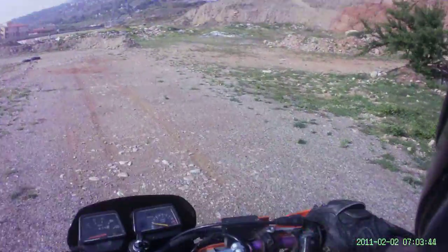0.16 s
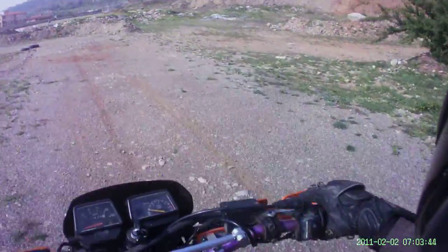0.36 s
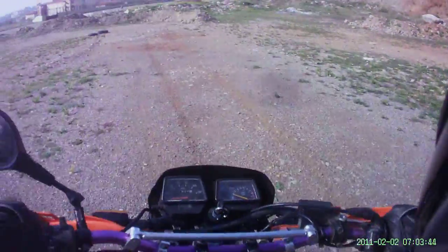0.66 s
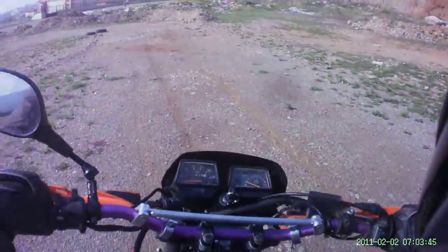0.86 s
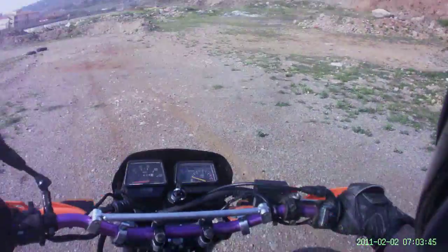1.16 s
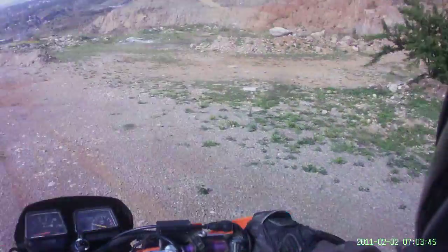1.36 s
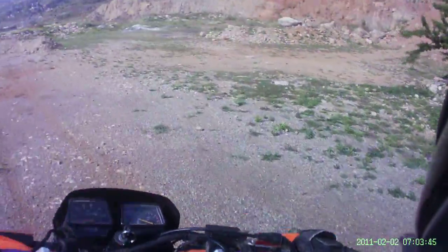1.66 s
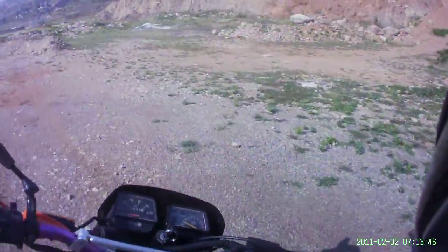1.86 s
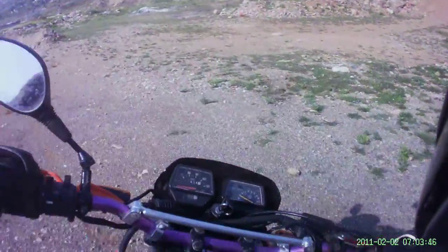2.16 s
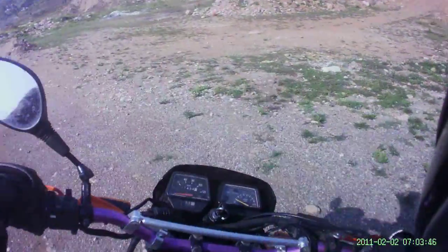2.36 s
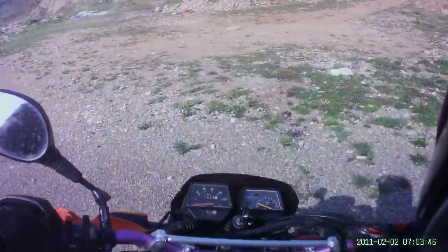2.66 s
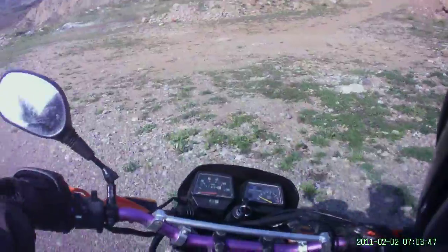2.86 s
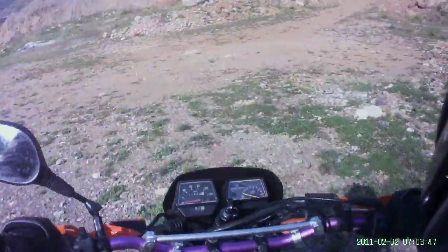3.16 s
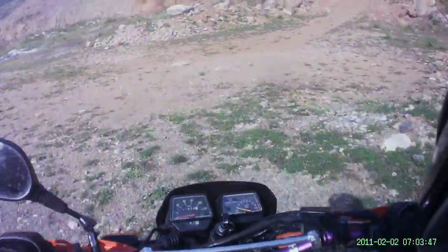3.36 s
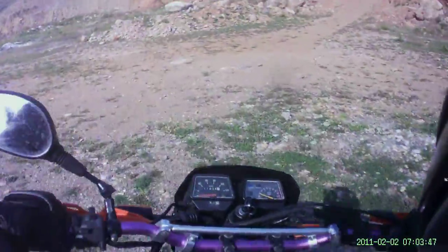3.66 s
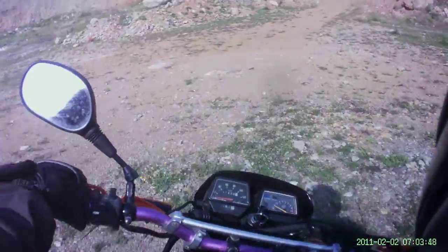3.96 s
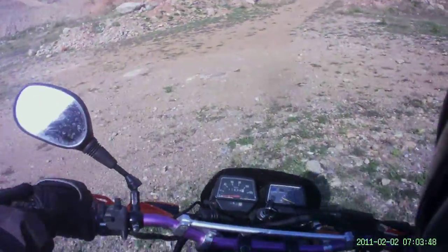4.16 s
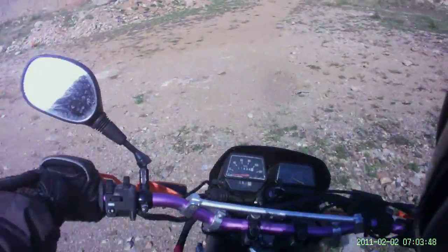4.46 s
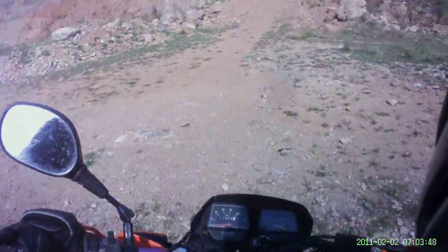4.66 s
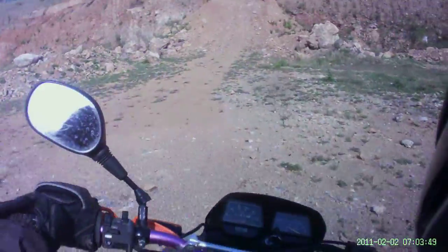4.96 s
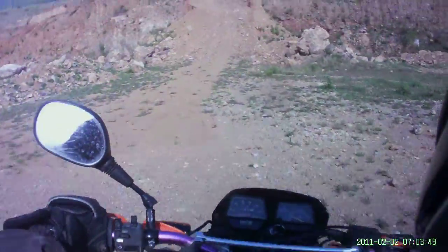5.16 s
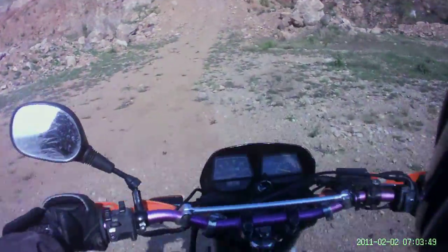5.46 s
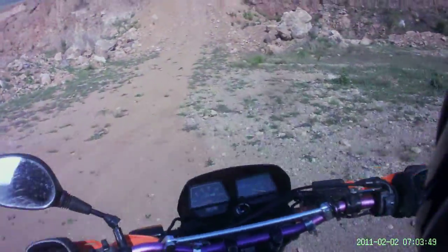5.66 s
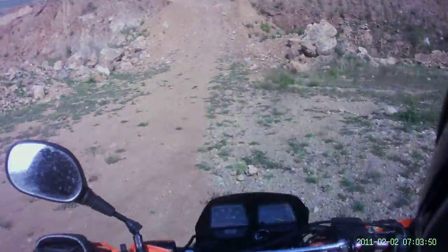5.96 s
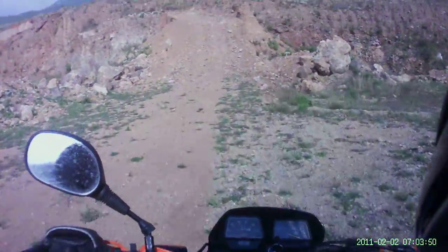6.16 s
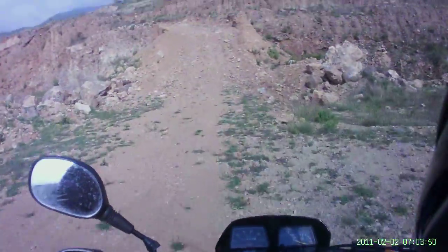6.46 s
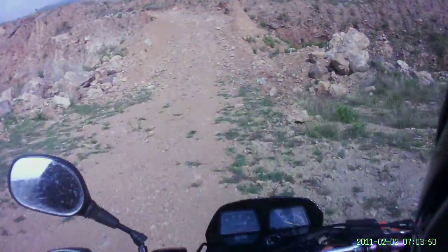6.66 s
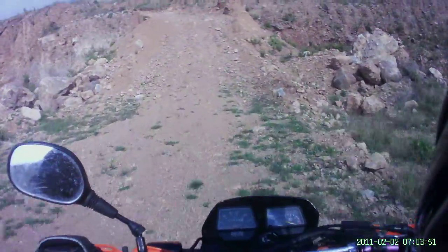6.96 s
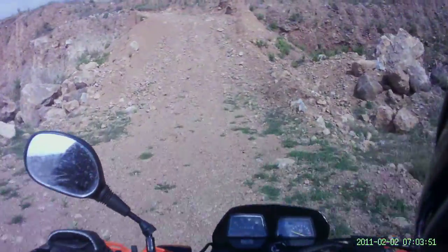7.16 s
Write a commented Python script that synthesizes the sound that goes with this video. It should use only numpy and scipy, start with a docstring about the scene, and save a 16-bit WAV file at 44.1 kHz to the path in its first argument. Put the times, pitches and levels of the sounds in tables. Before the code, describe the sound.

Close, muffled motorcycle engine thumps unevenly, surges in two throttle bursts, then growls upward under load amid rising wind rumble and crunching stones.

```python
"""A four-stroke single-cylinder motorcycle is ridden over gravel, heard close up on a small camera worn by the rider.
Two short bursts of throttle with coasting between them lead to a long pull towards a hill as the wind rises.
Clicks and suction timed by the engine cycle ring through filters; sweeping tones sing and drone under them.
Shaped noise makes the gas rasp, chain, valve gear, tyres, loose stones and wind; the hard buffets are pulses.
The muffled microphone hisses, and its converter chirps on high crests of the wave."""
import sys
import numpy as np
from scipy import signal
from scipy.fft import rfft, irfft
from scipy.io import wavfile
from scipy.ndimage import map_coordinates

SR = 44100
rng = np.random.default_rng(int(sys.argv[2]) if len(sys.argv) > 2 else 0)


def to_wav(sig):
    """Store sig (one row per channel, or 1-D mono) as 16-bit WAV at the path in sys.argv[1].

    Samples outside -1..1 are clipped; the rate is SR.
    """
    pcm = np.clip(np.atleast_2d(sig), -1, 1) * 32767
    pcm = np.round(pcm).astype(np.int16)
    wavfile.write(sys.argv[1], SR, pcm.T)  # frames by channels


N = 322812
TIME = np.arange(N) / SR


def from_db(db):
    """Amplitude factor of a level in dB."""
    return 10 ** (np.asarray(db) / 20)


def rms_one(x):
    """Scales a signal to an rms of 1."""
    return x / np.sqrt(np.mean(x ** 2) + 1e-20)


def in_time(rows):
    """Value of a (seconds, value) curve at every sample."""
    seconds, values = np.transpose(rows)
    return np.interp(TIME, seconds, values)


def ramp(start_s, length_s):
    """Rises evenly from 0 to 1."""
    return np.clip((TIME - start_s) / length_s, 0, 1)


def colour(x, spectrum, size=16384):
    """Causal (minimum-phase) filter with the given spectrum, made by folding its cepstrum."""
    hz, level_db = np.transpose(spectrum)
    grid_hz = np.maximum(np.fft.rfftfreq(size, 1 / SR), 1)
    gain = from_db(np.interp(np.log(grid_hz), np.log(hz), level_db))
    cepstrum = irfft(np.log(gain))
    cepstrum[1:size // 2] *= 2
    cepstrum[size // 2 + 1:] = 0
    impulse = irfft(np.exp(rfft(cepstrum)))
    return signal.fftconvolve(x, impulse)[:len(x)]


def noise(spectrum, gate=1):
    """Gated white noise through a spectrum; rms 1."""
    return rms_one(colour(gate * rng.standard_normal(N), spectrum))


def drift(rate):
    """Smooth curve through random points of spread 1, rate points a second."""
    points = rng.standard_normal(1024)
    return map_coordinates(points, [TIME * rate], order=3, mode="wrap")


def pulses(cycles, at, spread_db):
    """One click per engine cycle at the given share of it; harmonics near height 1, uneven by spread_db."""
    count = np.floor(cycles - at).astype(int)
    clicks = np.diff(count, prepend=count[0])
    strength = from_db(spread_db * rng.standard_normal(512)[count])
    return clicks * strength / (2 * np.gradient(cycles))


def resonance(hz, centre_hz, width_hz):
    """Gain of a tone that sweeps through a resonance; 1 at its centre, 1/2 at the half-width."""
    return 1 / (1 + ((hz - centre_hz) / width_hz) ** 2)


# Twists of the throttle. Each row: start of opening in seconds, roll-on time in seconds,
# start of closing in seconds, opening from 0 to 1.
THROTTLE_TWISTS = [(0.52, .52, 2.14, 0.8), (3.42, 0.205, 4.23, 0.8), (4.68, 0.071, 7.32, 0.62)]
ROLL_OFF_S = 0.0946


def throttle_opening():
    """Each twist rolls on, holds and snaps shut."""
    throttle = np.zeros(N)
    for opens_s, roll_on_s, closes_s, opening in THROTTLE_TWISTS:
        throttle += opening * ramp(opens_s, roll_on_s) * (1 - ramp(closes_s, ROLL_OFF_S))
    return throttle


# Path of the exhaust thump to the rider's microphone. Each row: frequency in Hz, gain in dB.
THUMP_PATH = [(20, -31), (35, -20.5), (60, 5), (90, 0), (120, -5), (160, -23), (240, -27), (330, -23.5),
              (420, -43), (1000, -59), (3000, -91.5)]
THUMP_AT = .104  # share of the cycle
# level when coasting, what full throttle and full load add, and the fall per halving below cruising speed
COAST_THUMP_DB, THUMP_THROTTLE_DB, THUMP_LOAD_DB, THUMP_SLOW_DB = -29, 1, 0.05, 9.0
CRUISE_RATE = 30  # firings per second; reference speed for the thump and the gas rasp


def exhaust_thump(cycles, firings, throttle, load, uneven_db):
    """The silencer thumps once per cycle, more weakly when the engine turns slowly."""
    octaves_slow = np.maximum(np.log2(CRUISE_RATE / firings), 0)
    engine_db = COAST_THUMP_DB + THUMP_THROTTLE_DB * throttle + THUMP_LOAD_DB * load
    thump_db = engine_db - THUMP_SLOW_DB * octaves_slow
    return colour(from_db(thump_db) * pulses(cycles, THUMP_AT, .8 * uneven_db), THUMP_PATH)


# Path of the intake gulp to the rider's microphone. Each row: frequency in Hz, gain in dB.
INTAKE_PATH = [(20, 1.5), (60, 5.5), (120, -0.5), (170, 2.5), (220, 6.5), (270, 12.5), (350, 6.5),
               (420, -14.5), (490, 1), (620, -14), (800, -22.5), (1500, -27), (4000, -58.5)]
INTAKE_SHARE = .123  # share of the cycle for which the valve is open
# level with the throttle shut, and what full throttle and full load add
GULP_DB, GULP_THROTTLE_DB, GULP_LOAD_DB = -50.5, 19, 4.5


def intake(cycles, throttle, load, uneven_db):
    """Suction through the open valve rings the air box; its constant angle hollows out the eighth harmonic."""
    gulp_db = GULP_DB + GULP_THROTTLE_DB * throttle + GULP_LOAD_DB * load
    chance = rng.standard_normal(512)[cycles.astype(int)]
    valve = (cycles % 1 < INTAKE_SHARE) / (2 * INTAKE_SHARE)
    flow = from_db(gulp_db + 1.4 * uneven_db * chance) * valve
    no_steady_flow = signal.butter(1, 10, "high", fs=SR, output="sos")
    return -colour(signal.sosfilt(no_steady_flow, flow), INTAKE_PATH)


# Colour of the gas rasp at the microphone. Each row: frequency in Hz, relative level in dB.
RASP_COLOUR = [(100, -7.5), (280, -2), (400, -0.5), (500, -1), (620, -4.5), (800, -19.5), (1100, -13),
               (2000, -42.5), (5000, -39)]
# level at cruising speed with the throttle shut, and what full throttle and full load add
RASP_DB, RASP_THROTTLE_DB, RASP_LOAD_DB = -60.0, 6, 10.0


def gas_rasp(cycles, throttle, load, puff_share=.13, between=0.11, octave_db=3.0):
    """Gas rasps in a fading puff on each cycle, louder per doubling of speed."""
    speed_octaves = np.log2(np.gradient(cycles) * SR / CRUISE_RATE)
    engine_db = RASP_DB + RASP_THROTTLE_DB * throttle + RASP_LOAD_DB * load
    puff = between + np.exp(-(cycles % 1) / puff_share)
    return from_db(engine_db + octave_db * speed_octaves) * noise(RASP_COLOUR, puff)


# Colour of chain, valve gear and tyres close below. Each row: frequency in Hz, relative level in dB.
CLATTER_COLOUR = [(200, -8), (600, 9), (880, 6.5), (1100, -3), (1270, -3.5), (1420, 1), (1650, -5),
                  (1950, -3.5), (3000, -10), (8000, -14.5)]
# level with the throttle shut, and what full throttle and full load add
CLATTER_DB, CLATTER_THROTTLE_DB, CLATTER_LOAD_DB = -61.0, 1.57, 6.0


def running_clatter(throttle, load, patchy_db=1.93):
    """Chain, valve gear and tyres rustle as noise of uneven strength."""
    clatter_db = CLATTER_DB + CLATTER_THROTTLE_DB * throttle + CLATTER_LOAD_DB * load
    return from_db(clatter_db) * noise(CLATTER_COLOUR, from_db(patchy_db * drift(90)))


# Strength of the wind on the microphone, before its gusts. Each row: time in seconds, level in dB.
WIND_STRENGTH = [(0, -38), (1.2, -37.5), (4.7, -38.5), (5.0, -29.5), (5.4, -29.5), (5.6, -25), (5.97, -22),
                 (6.5, -27.5), (6.9, -26), (7.1, -19), (7.32, -17.5)]
# Colour of the wind on the microphone. Each row: frequency in Hz, relative level in dB.
WIND_COLOUR = [(10, -9.5), (25, 0), (45, 3.5), (90, -2), (165, -3.5), (240, -14.5), (400, -26.5),
               (800, -42), (3000, -73.5)]


def wind(gust_db=0.88):
    """Wind on the microphone makes a lumpy low rumble."""
    return from_db(in_time(WIND_STRENGTH) + gust_db * drift(18)) * noise(WIND_COLOUR)


# Patches of loose stones under the tyres. Each row: time of the middle in seconds,
# time from there to 1/e of the height in seconds, level at the middle in dB.
STONE_PATCHES = [(0.115, 0.21, -51.5), (2.35, .2, -56), (7.219, .14, -41)]
# Colour of their crunch at the microphone. Each row: frequency in Hz, relative level in dB.
CRUNCH_COLOUR = [(100, -5.5), (380, 0), (650, -2.5), (1000, -14), (1600, -24), (2400, -24.5), (5000, -36.5)]


def loose_stones(lumpy_db=3.5):
    """A lumpy crunch swells and fades as the tyres cross each patch."""
    patches = np.zeros(N)
    for middle_s, half_s, level_db in STONE_PATCHES:
        patches += from_db(level_db) * np.exp(-((TIME - middle_s) / half_s) ** 2)
    return patches * noise(CRUNCH_COLOUR, from_db(lumpy_db * drift(80)))


# the long pull: start and swell time, then centre, half-width and peak level of the pipe resonance
GROWL_START_S, GROWL_SWELL_S = 4.65, 0.44
GROWL_HZ, GROWL_WIDTH_HZ, GROWL_PEAK_DB = 286.5, 75.8, -32.5


def pipe_growl(cycles, firings):
    """On the long pull the pipe sings on the ninth harmonic, strongest near its resonance."""
    ninth = np.cos(2 * np.pi * 9 * (cycles - .08))
    ring = resonance(9 * firings, GROWL_HZ, GROWL_WIDTH_HZ) * ninth
    return from_db(GROWL_PEAK_DB) * ramp(GROWL_START_S, GROWL_SWELL_S) * ring


# Path of the exhaust bark to the rider's microphone. Each row: frequency in Hz, gain in dB.
BARK_PATH = [(30, -23), (100, -14), (170, -1.5), (240, 3), (320, -1.5), (400, -19), (480, -12.5),
             (600, -19), (800, -43.5), (1100, -33), (1500, -40.5), (4000, -66.5)]
BARK_AT, LOADED_BARK_DB = .53, -33.5  # share of the cycle, level at full load


def exhaust_bark(cycles, load, uneven_db):
    """Under load the exhaust barks once per cycle; its pressure pulse is negative."""
    clicks = pulses(cycles, BARK_AT, 1.273 * uneven_db)
    return -colour(from_db(LOADED_BARK_DB) * load * clicks, BARK_PATH)


# frame resonance: centre, half-width, peak level at full load
FRAME_HZ, FRAME_WIDTH_HZ, FRAME_DB = 84.1, 17, -16.5


def frame(cycles, firings, load):
    """The unbalanced piston shakes the frame twice per firing; it drones under load near its resonance."""
    drone = from_db(FRAME_DB) * load * resonance(2 * firings, FRAME_HZ, FRAME_WIDTH_HZ)
    return drone * np.cos(4 * np.pi * (cycles - .07))


# Hard buffets of wind on the microphone. Each row: time of the first peak in seconds,
# scale in dB (each peak stands 4.3 dB lower).
WIND_BUFFETS = [(7.028, -10.5), (7.074, -4), (7.107, 0), (7.141, -9), (7.181, -8.5), (7.239, 1),
                (7.258, -4)]


def buffets(buffet_s=0.0029):
    """Each hard buffet pushes the microphone one way, then pulls it back."""
    out = np.zeros(N)
    for peak_s, scale_db in WIND_BUFFETS:
        age = np.clip((TIME - peak_s) / buffet_s, -10, 10) - 1 / 2
        out -= from_db(scale_db) * 2 * age * np.exp(-2 * age ** 2)
    return out


# Engine speed along the ride. Each row: time in seconds, firings per second.
ENGINE_SPEED = [(0.0, 24.48), (0.5, 21.53), (0.97, 26.6), (1.1, 30.86), (1.17, 28.94), (1.56, 30.2),
                (2.13, 34.16), (2.4, 31.19), (2.93, 28.76), (3.52, 24.52), (3.88, 33.69), (4.13, 30.94),
                (4.22, 32.56), (4.74, 27.44), (4.89, 23.04), (5.05, 26.7), (5.81, 36.84), (6.03, 37.4),
                (6.71, 43.21), (7.32, 46.56)]
CLIMB_S, LOAD_BUILD_S = 4.97, .8  # the slope begins to load the engine; time to full load
# base spread between cycles, throttle shut and wide open; each part scales it
UNEVEN_SHUT_DB, UNEVEN_OPEN_DB = 2.51, 0.35


def scene():
    """Speed, throttle and the load of the slope drive the engine; stones crunch below, wind blows over it."""
    firings = in_time(ENGINE_SPEED)
    throttle = throttle_opening()
    load = ramp(CLIMB_S, LOAD_BUILD_S)
    uneven_db = UNEVEN_SHUT_DB + (UNEVEN_OPEN_DB - UNEVEN_SHUT_DB) * throttle
    # uneven burns also make the crank run slightly early or late
    cycles = np.cumsum(firings) / SR + .004 * uneven_db * drift(20)
    engine = exhaust_thump(cycles, firings, throttle, load, uneven_db)
    engine += intake(cycles, throttle, load, uneven_db)
    engine += gas_rasp(cycles, throttle, load)
    surroundings = running_clatter(throttle, load) + wind() + loose_stones()
    engine += pipe_growl(cycles, firings)
    engine += exhaust_bark(cycles, load, uneven_db)
    engine += frame(cycles, firings, load)
    return (engine + surroundings + buffets())[None]


# Colour of the microphone's hiss. Each row: frequency in Hz, relative level in dB.
HISS_COLOUR = [(100, 0.69), (1500, 1), (3000, -0.098), (8000, -0.34), (15000, -0.12)]
CUTOFF_HZ = 15850  # top of the microphone's range


def record(dry, hiss_db=-57.0, swell=6.1, idle_level=.245, sweep_hz=240000, chirp_db=-41.5):
    """The converter's hiss swells with the wave; its idle tone sweeps into earshot near one input level."""
    x = dry[0]
    hiss = from_db(hiss_db) * noise(HISS_COLOUR) * np.hypot(1, swell * np.clip(x, -.25, .25))
    tone_hz = sweep_hz * (x - idle_level)
    # the tone fades out over the last 4 kHz below half the sample rate
    audible = np.clip((SR / 2 - np.abs(tone_hz)) / 4000, 0, 1)
    chirps = from_db(chirp_db) * audible * np.sin(2 * np.pi * np.cumsum(tone_hz) / SR)
    # 4 ms fades of the scene at both ends
    edge = np.clip(np.minimum(TIME, TIME[-1] - TIME) / .004, 0, 1)
    faded = x * np.sin(np.pi / 2 * edge) ** 2
    low_pass = signal.firwin(401, CUTOFF_HZ, fs=SR)
    return signal.fftconvolve(faded + hiss + chirps, low_pass, "same")[None]


dry = scene()
out = record(dry)
to_wav(out)
```